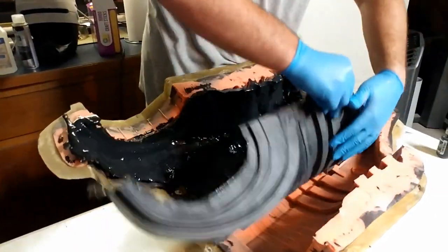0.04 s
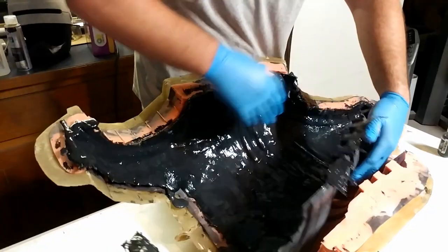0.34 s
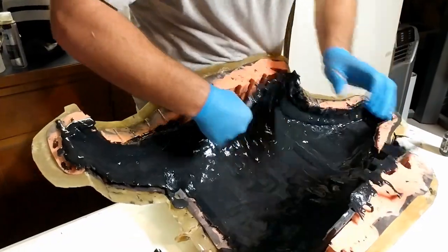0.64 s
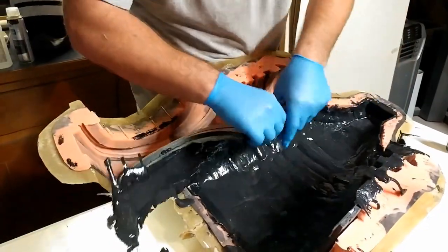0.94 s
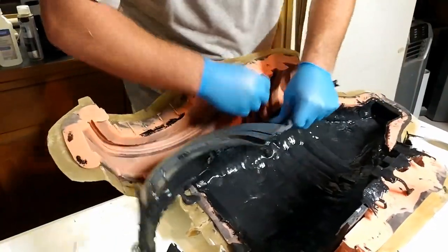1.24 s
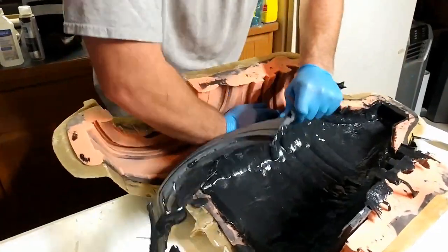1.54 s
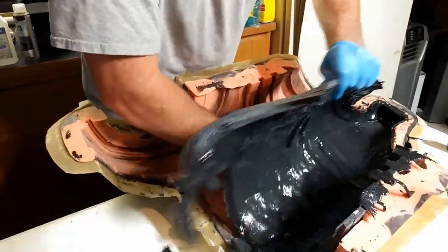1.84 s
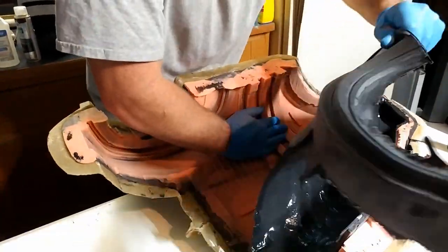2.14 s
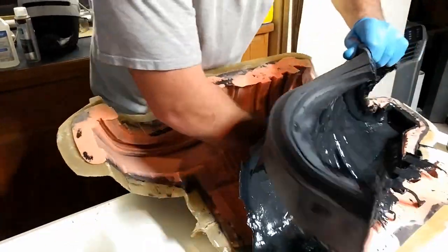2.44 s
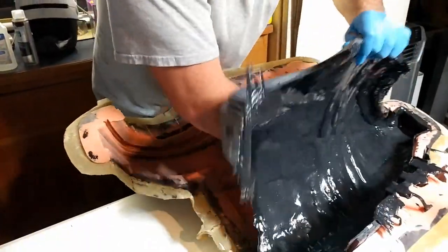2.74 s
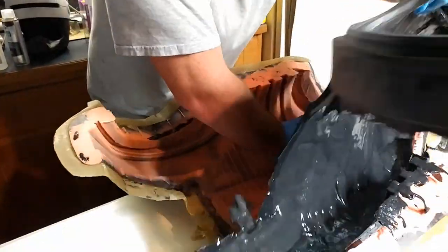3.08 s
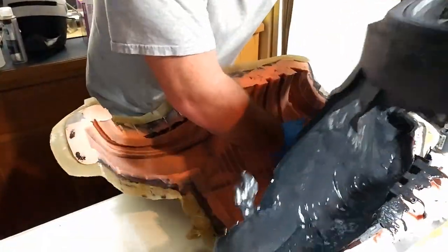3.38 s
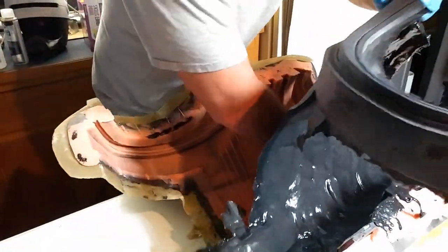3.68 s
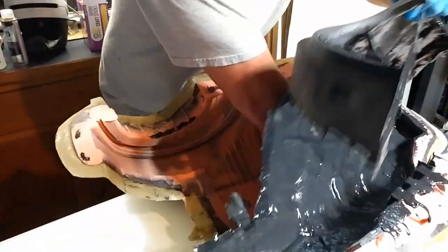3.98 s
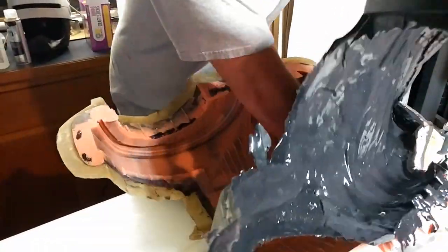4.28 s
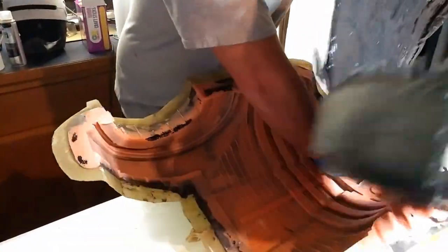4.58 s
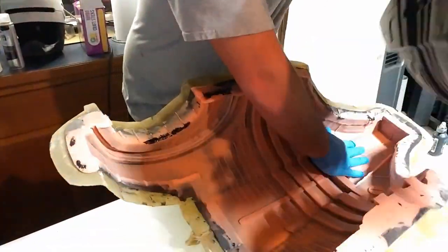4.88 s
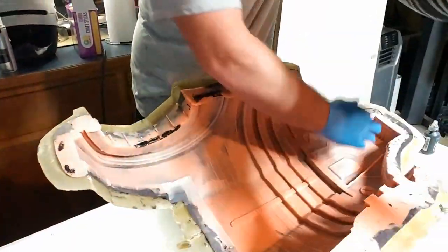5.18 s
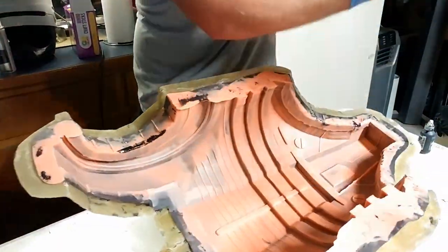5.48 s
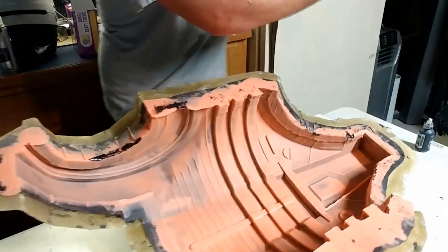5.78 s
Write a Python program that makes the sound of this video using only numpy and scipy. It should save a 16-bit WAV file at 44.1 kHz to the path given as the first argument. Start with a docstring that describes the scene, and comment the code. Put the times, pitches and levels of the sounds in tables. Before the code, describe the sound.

Gloved hands peel a soft foam casting from a silicone mold, close to a stereo microphone in a small workshop with a faint low rumble. Tacky crackling and rustling rise and fall throughout, dotted with tiny snaps of sticky threads. A flap slaps the hollow mold with a pop at 0.3 seconds, and rubber squeaks briefly around 1 second. Dull dragging and light slaps follow. From 2 to 2.6 seconds, air pockets open in a cluster of louder hollow pops, with a squeak and a tearing rasp. Two more pops come near 3.8 seconds and a soft slap at 4. After a few sharp snaps, the mold's hard shell clacks slightly to the right at about 4.9 seconds, followed by a sticky rip, a firm slap and a squeak at 5. From 5.6 seconds the freed casting slides away with a hiss that gradually dulls.

```python
"""Tacky skin rustles and crackles as gloved hands peel a soft foam casting out of a silicone mold,
close to a stereo microphone at a table in a small workshop. Countless tiny bonds break under the pull,
sticky threads snap, rubber squeaks, loose flaps slap the hollow mold and air pockets pop open.
Near the end the mold's hard shell clacks, and the freed casting slides away with a hiss."""
import sys
import numpy as np
from scipy import signal
from scipy.fft import rfft, irfft, next_fast_len
from scipy.io import wavfile

SR = 44100
rng = np.random.default_rng(int(sys.argv[2]) if len(sys.argv) > 2 else 0)


def inscribe(sig):
    """Save sig as 16-bit PCM at rate SR to the path in sys.argv[1].

    A 1-D sig is mono; a 2-D sig holds one channel per row.
    Samples are clipped to [-1, 1] before scaling.
    """
    pcm = np.round(np.clip(np.atleast_2d(sig).T, -1, 1) * 32767)
    wavfile.write(sys.argv[1], SR, pcm.astype(np.int16))


N = 265482
TIME = np.arange(N) / SR
BLOW_TIME = np.arange(SR // 3) / SR
RUB_EDGES_HZ = [120, 700, 2000, 6000, 17000]   # bands: body, scrape, rasp, hiss
BLOW_EDGES_HZ = [125, 260, 700, 1450, 3300, 10000]   # bands: thump, body, smack, crack, tick


def from_db(db):
    """Decibels to gain."""
    return 10 ** (np.asarray(db) / 20)


def unit_power(pair, size):
    """Scale a pair so that its centre has unit power over `size` samples."""
    return pair / np.sqrt(np.sum(pair.mean(axis=0) ** 2) / size + 1e-20)


def at_hz(points, hz):
    """Read a table on a log-frequency axis."""
    freq_hz, value = np.transpose(points)
    return np.interp(np.log(np.maximum(hz, 1)), np.log(freq_hz), value)


def centres(edges_hz):
    """The geometric centre of each band."""
    return np.sqrt(np.multiply(edges_hz[1:], edges_hz[:-1]))


def band(x, low_hz, high_hz, order=2):
    """Causal band-pass."""
    return signal.sosfilt(signal.butter(order, [low_hz, high_hz], "band", fs=SR, output="sos"), x)


def resonate(x, hz, width_hz):
    """A resonance with gain 1 at its peak."""
    radius = np.exp(-np.pi * width_hz / SR)
    poles = [1, -2 * radius * np.cos(2 * np.pi * hz / SR), radius ** 2]
    return signal.lfilter(np.array([1, 0, -1]) * (1 - radius ** 2) / 2, poles, x + 1e-18)


def pan(lean_db):
    """Left and right gains; positive leans left."""
    return from_db(np.array([[.5], [-.5]]) * lean_db)


def fade(t, t60_s):
    """Exponential decay, 60 dB down at t60_s."""
    return from_db(-60 * t / t60_s)


def ramp(t, half_time_s):
    """A smooth step from 0 to 1 around t = 0."""
    return (1 + np.sin(np.pi / 2 * np.clip(t / half_time_s, -1, 1))) / 2


def drift(rate_hz):
    """A random wander around zero."""
    knots = rng.standard_normal(N // 20)
    return np.interp(TIME * rate_hz, np.arange(len(knots)), knots)


def add(out, start_s, sound):
    """Mix a sound in at a time."""
    at = round(start_s * SR)
    out[:, at:at + sound.shape[-1]] += sound[..., :out.shape[-1] - at]


# How alike the microphone's two sides are: freq_hz, correlation
STEREO_LIKENESS = [(60, 0.94), (250, 0.95), (450, 0.83), (800, 0.47), (1400, 0.42), (2800, 0), (9000, 0)]
# How the sound leans across the microphone: freq_hz, left_minus_right_db
STEREO_LEAN = [(100, -0.6), (400, -0.5), (800, -0.5), (1400, -4.5), (2800, -6), (6000, -2), (9500, -1.5),
               (13000, 1.5)]
def spread(pair, colour=((10, 0), (20000, 0))):
    """Two unrelated signals become a coloured stereo pair, alike in the bass and apart in the treble."""
    size = pair.shape[-1]
    padded = next_fast_len(size, True)
    hz = np.fft.rfftfreq(padded, 1 / SR)
    mid, side = rfft(pair, padded)
    alike = at_hz(STEREO_LIKENESS, hz)
    both = np.sqrt(1 + alike) * mid + np.sqrt(1 - alike) * side * [[1], [-1]]
    return irfft(both * pan(at_hz(STEREO_LEAN, hz)) * from_db(at_hz(colour, hz)), padded)[:, :size]


def stereo_noise(t):
    """White noise spread across the microphone, as long as t."""
    return spread(rng.standard_normal((2, len(t))))


# The quiet workshop all around the microphone: freq_hz, density_db
ROOM_COLOUR = [(22, -24), (33, 2), (50, 9), (90, 5.5), (166, -2.5), (344, -10.5), (545, -12.5),
               (1330, -19.5), (3000, -22), (7000, -29.5), (16000, -30.5)]
def room_tone(level_db):
    """The room's steady low rumble."""
    return from_db(level_db) * unit_power(spread(rng.standard_normal((2, N)), ROOM_COLOUR), N)


def crackle(colour, grains_per_s, grain_spread_db, smooth_db):
    """Countless tiny bonds break over a smooth hiss; each break reaches both channels."""
    sizes = from_db(grain_spread_db * np.minimum(rng.exponential(1, N), 4))
    breaks = rng.random(N) < grains_per_s / SR
    grains = sizes * breaks * rng.standard_normal((2, N))
    grains /= np.sqrt(np.mean(grains ** 2))
    return spread(grains + from_db(smooth_db) * rng.standard_normal((2, N)), colour)


# Peeling skin heard close up: freq_hz, density_db
PEEL_COLOUR = [(100, 3), (150, -6.5), (200, -7), (350, -3), (600, -6.5), (1100, -14.5), (1500, -16.5),
               (3600, -15), (4600, -19), (5800, -21), (7000, -28), (9000, -18.5), (16000, -29.5)]
# The crackle rising and falling with the pull: time_s, relative_db
PULL_LEVELS = [(0, -43.5), (.17, -60.5), (.45, -52.5), (.6, -60), (1, -53.5), (1.4, -56), (1.75, -52.5),
               (2.2, -51), (2.38, -52), (2.55, -50), (2.9, -55.5), (3.15, -51.5), (3.5, -67.5),
               (3.9, -55.5), (4.1, -51.5), (4.37, -62), (5.5, -57.5)]
def tacky_skin(gain_db):
    """The skin crackles as it parts under the steady pull."""
    bonds = crackle(PEEL_COLOUR, grains_per_s=250, grain_spread_db=1, smooth_db=4.5)
    pull_db = np.interp(TIME, *np.transpose(PULL_LEVELS))
    return from_db(gain_db + pull_db) * unit_power(band(bonds, 92, 14400), N)


def friction(gains, texture, stutter_db, stutter_hz):
    """Each band of a rub stutters as the surface sticks and slips."""
    shared_slip, out = drift(stutter_hz), 0
    for gain, low, high in zip(gains, RUB_EDGES_HZ, RUB_EDGES_HZ[1:]):
        stutter = from_db(stutter_db * (shared_slip + .5 * drift(stutter_hz)))
        out += gain * stutter * unit_power(band(texture, low, high, order=3), N)
    return out


# Strokes of the hands at the table, levels relative: start_s, end_s, drag_db, tear_db
HAND_STROKES = [(.01, .058, -53, -39.5), (0.267, .282, -59, -49), (0.406, .44, -53.5, -50.5),
                (0.728, 0.858, -62, -53.5), (1.038, 1.089, -45, -52.5), (1.375, 1.391, -54, -57.5),
                (1.521, 1.613, -42, -52.5), (1.62, 1.767, -53.5, -71), (1.825, 1.908, -42, -59),
                (1.959, 2.094, -40, -42.5), (1.988, 2.03, -32, -35.5), (2.278, 2.303, -40, -47),
                (2.578, 2.84, -43.5, -65.5), (2.975, 3.084, -48, -60), (4.019, 4.048, -39, -71),
                (4.15, 4.277, -47, -74), (4.452, 4.545, -64.5, -61.5), (4.628, 4.791, -58, -56.5),
                (4.873, 4.956, -43.5, -34.5), (4.939, 5.055, -36, -54), (5.183, 5.205, -62, -61),
                (5.479, 5.578, -54, -78)]
def hand_strokes(gain_db):
    """With each stroke the foam drags dully on the mold while its tacky skin tears away."""
    drag_bands_db, tear_bands_db = np.array([.5, -.5, -8, -43.5]), np.array([-16, -12.5, -1.5, -1.5])
    sticky = crackle(PEEL_COLOUR, grains_per_s=1500, grain_spread_db=3.5, smooth_db=4.5)
    power, t = 0, TIME[::20]
    for start_s, end_s, drag_db, tear_db in HAND_STROKES:
        ease_s = .17 * (end_s - start_s)   # long strokes swell and let go more gently
        shape = ramp(t - start_s, .02 + ease_s) * ramp(end_s - t, .025 + ease_s)
        band_powers = from_db(drag_bands_db + drag_db) ** 2 + from_db(tear_bands_db + tear_db) ** 2
        power += np.outer(band_powers, shape)
    gains = [np.interp(TIME, t, gain) for gain in np.sqrt(power)]
    return from_db(gain_db) * friction(gains, sticky, stutter_db=2.5, stutter_hz=70)


# Small sticky snaps at the fingers: start_s, relative_db, pitch_hz, t60_s
THREAD_SNAPS = [(.139, -47, 3660, 0.049), (.2089, -48.5, 9500, .051), (.4296, -44, 3040, 0.074),
                (0.496, -41.5, 3100, 0.33), (0.728, -38, 6000, 0.045), (2.279, -33, 2590, 0.046),
                (3.7183, -52.5, 8600, 0.059), (4.412, -42, 3350, 0.15), (4.664, -32, 2620, .1),
                (4.74, -45, 1300, .06), (4.7846, -31, 8260, 0.0092), (5.249, -50.5, 9800, .04)]
def snaps(gain_db, width_share):
    """Single sticky threads and glove creases snap, each a noise burst in a broad resonance."""
    out = np.zeros((2, N))
    for start_s, level_db, hz, t60_s in THREAD_SNAPS:
        burst = stereo_noise(BLOW_TIME) * fade(BLOW_TIME, t60_s)
        snap = unit_power(resonate(burst, hz, hz * width_share), size=200)
        add(out, start_s, from_db(level_db + gain_db) * snap)
    return out


# Rubber slipping close by: centre_s, half_length_s, pitch_hz, width_share, relative_db
RUBBER_SLIPS = [(0.267, 0.015, 1080, 0.11, -50.5), (.268, 0.012, 2530, 0.14, -42),
                (.271, .012, 3860, 0.089, -48.5), (0.404, 0.0031, 2900, 0.057, -41.5),
                (1.042, 0.017, 1112, 0.08, -36.5), (1.064, 0.022, 3430, 0.19, -41),
                (1.274, 0.021, 9800, 0.23, -49.5), (1.6, 0.045, 11400, 0.53, -47),
                (1.996, 0.013, 920, .08, -31), (2.018, 0.014, 4270, 0.072, -37),
                (2.286, 0.0024, 2100, 0.27, -23), (3.073, .035, 3200, .17, -53.5),
                (4.225, .035, 4600, 0.3, -51.5), (5.011, 0.0091, 1145, 0.12, -22.5)]
def squeaks(gain_db):
    """Quick slips of rubber on rubber feed one resonance, narrow for a squeak and wide for a rasp."""
    out, t = np.zeros((2, N)), BLOW_TIME
    middle_s = t.mean()
    for centre_s, half_length_s, hz, width_share, level_db in RUBBER_SLIPS:
        slips = resonate(stereo_noise(t), hz, hz * width_share)
        swell = np.exp(-((t - middle_s) / half_length_s) ** 2 / 2)
        squeak = unit_power(slips * swell, np.sum(swell ** 2))
        add(out, centre_s - middle_s, from_db(level_db + gain_db) * squeak)
    return out


def smack(levels_db, t60_s, rise_s, treble_shortening):
    """A soft contact spreads over an area: a burst of noise whose treble dies first."""
    t, out = BLOW_TIME, 0
    noise = stereo_noise(t)
    for level_db, low, high in zip(levels_db, BLOW_EDGES_HZ, BLOW_EDGES_HZ[1:]):
        shape = (1 - np.exp(-t / rise_s)) * fade(t, t60_s * (400 / low) ** treble_shortening)
        burst = band(noise * shape, low, high, order=3 if high < 2000 else 2)
        out += from_db(level_db) * unit_power(burst, size=1300)
    return out


# Resonances of the hollow mold on its table: pitch_hz, width_hz, gain_db
MOLD_MODES = [(149.8, 14.6, -0.5), (352, 38, 1), (474, 14, -41), (816, 104, -3.5), (925, 48, -3.5),
              (1089, 53, -2.5), (1930, 27, -22), (3050, 160, -21)]
def mold(x):
    """The hollow mold adds its resonances to whatever touches it."""
    return x + sum(from_db(db) * resonate(x, hz, width_hz) for hz, width_hz, db in MOLD_MODES)


def mold_boom(levels_db, damping):
    """A blow sets the mold's modes ringing, each as hard as the blow is strong at that pitch."""
    force = np.transpose([centres(BLOW_EDGES_HZ), levels_db])
    out, t = 0, BLOW_TIME
    for hz, width_hz, db in MOLD_MODES:
        decay = np.exp(-np.pi * width_hz * damping * t)
        out += from_db(at_hz(force, hz) + db) * np.sin(2 * np.pi * hz * t) * decay
    return out


# Foam flaps landing on the mold: start_s, relative_db, tilt_db_per_octave, thump_db, base_t60_s, rise_s
FLAP_SLAPS = [(.323, -29, 1.1, -5, .12, 0.00068), (.727, -50.5, -1.5, 3.5, 0.07, 0.0005),
              (0.9128, -47.5, -1.1, -8, 0.079, .0004), (1.552, -41.5, 4.5, -7, 0.083, 0.0011),
              (1.654, -53, 0.5, 11.5, 0.14, 0.0014), (1.84, -35, 1.8, -1, 0.047, .0006),
              (2.686, -43, -6, -7, 0.2, 0.001), (3.988, -33.5, -5, -7.5, .077, 0.0017),
              (4.506, -54.5, 4, 12, 0.053, 0.00059), (4.622, -47, 2, 7.5, .065, 0.00091),
              (4.858, -32, 3.5, 3.5, 0.04, .0012), (4.928, -39, 6.5, 14.5, 0.083, .0006),
              (4.998, -23, -0.5, -1, 0.043, 0.0039), (5.165, -49, -6, -4, .1, .003)]
def slaps():
    """A flap's edge touches with a short crack as its face lands and the mold booms."""
    slap_bands_db, face_bands_db = np.array([-3.5, 0, -3.5, -5, -29]), [-3, -8.5, -1, -3, -1]
    octaves = np.log2(centres(BLOW_EDGES_HZ) / 686)
    out = np.zeros((2, N))
    for start_s, level_db, tilt_db, thump_db, t60_s, rise_s in FLAP_SLAPS:
        levels_db = slap_bands_db + level_db + tilt_db * octaves
        levels_db[0] += thump_db
        edge_db = -16 - 2500 * rise_s   # the longer a flap takes to land, the weaker its edge
        edge = smack(levels_db + edge_db, t60_s=.012, rise_s=.000086, treble_shortening=.48)
        face = smack(levels_db + face_bands_db, t60_s, rise_s, treble_shortening=.035)
        add(out, start_s, edge + face + from_db(3) * mold_boom(levels_db, damping=1.48))
    return out


# Air pockets between foam and mold, levels relative:
# start_s, cavity_db, pitch_hz, cavity_t60_s, skin_db, skin_base_t60_s
AIR_POCKETS = [(.332, -29, 350, .09, -50, .05), (1.986, -24, 547, 0.12, -38, 0.055),
               (2.0131, -17.5, 334, 0.15, -31, 0.062), (2.0969, -22.5, 387, 0.063, -30.5, 0.026),
               (2.1514, -26.5, 360.5, 0.12, -33.5, 0.089), (2.2838, -24.5, 361, 0.047, -36.5, 0.013),
               (2.4261, -23.5, 357.3, 0.15, -29, 0.12), (2.554, -23, 326, 0.073, -56, 0.022),
               (2.5639, -26, 368, 0.15, -57, .03), (3.759, -27, 382, 0.18, -66, 0.039),
               (3.805, -25, 379, 0.048, -49, 0.045)]
def pops(gain_db, sag_share, sag_s):
    """A pocket gulps open and the skin smacks free; the cavity rings, sinking in pitch as it widens."""
    skin_bands_db = np.array([-4.5, -4.5, -5.5, -12.5, -29])
    out, t = np.zeros((2, N)), BLOW_TIME
    for start_s, cavity_db, hz, t60_s, skin_db, skin_t60_s in AIR_POCKETS:
        gulp = from_db(4) * np.sin(2 * np.pi * hz * 1.4 * t) * fade(t, .0083)
        sinking_hz = hz * (1 + sag_share * (np.exp(-t / sag_s) - .5))
        cavity = np.sin(2 * np.pi * np.cumsum(sinking_hz) / SR) * fade(t, t60_s)
        skin = smack(skin_bands_db + skin_db, skin_t60_s, rise_s=.0003, treble_shortening=.081)
        # a quieter, lower tone rings on after the cavity fades
        low_ring = from_db(-13.5) * np.sin(2 * np.pi * hz * .87 * t) * fade(t, .24)
        pop = skin - from_db(cavity_db) * band(gulp + cavity + low_ring, 147, 1080) * pan(-1.3)
        # each pocket lies somewhere else, so the room answers each differently
        add(out, start_s, workshop(pop, wet_db=-8.5, build_s=.0029))
    return from_db(gain_db) * out


# The mold's hard outer shell, to the microphone's right: pitch_hz, relative_db, t60_s
SHELL_MODES = [(1797, -14.5, 0.017), (1924, -19, 0.031), (2400, -32, 0.041), (3230, -17.5, 0.022),
               (3530, -27.5, 0.074), (4700, -33, 0.056)]
def shell_clack(start_s, rise_s, lean_db):
    """As the casting comes free the stiff shell rings briefly, damped by its rubber lining."""
    out, t = np.zeros((2, N)), BLOW_TIME
    attack = 1 - np.exp(-t / rise_s)
    for hz, db, t60_s in SHELL_MODES:
        phase = rng.uniform(0, np.pi, (2, 1))
        add(out, start_s, from_db(db) * np.sin(2 * np.pi * hz * t + phase) * attack * fade(t, t60_s))
    return band(out, 800, 5900) * pan(lean_db)


# The sliding casting heard close up: freq_hz, density_db
CASTING_COLOUR = [(100, -3), (160, -11), (450, -7), (700, -12.5), (1000, 10.5), (2300, -2), (6000, -6),
                  (7500, -9), (9000, -4), (16000, -19)]
def casting_slide(start_s, swell_s, lag_s_per_octave, dulling_db_per_octave_s):
    """The slide swells from the lows upward as it gathers speed, then dulls as the casting settles."""
    bands_db = [-50.5, -43, -36, -36.5]
    smooth = crackle(CASTING_COLOUR, grains_per_s=8000, grain_spread_db=1.5, smooth_db=2.5)
    t, gains = TIME - start_s, []
    for db, octave in zip(bands_db, np.log2(centres(RUB_EDGES_HZ) / 1850)):
        swell = (1 + np.tanh((t - lag_s_per_octave * octave) / swell_s)) / 2
        dulling_db = dulling_db_per_octave_s * octave * np.maximum(t, 0)
        gains.append(swell * from_db(db - dulling_db))
    return friction(gains, smooth, stutter_db=1.02, stutter_hz=40)


# The workshop's reverberation around the table: freq_hz, t60_s
ROOM_DECAY = [(100, 0.36), (400, 0.31), (1500, 0.24), (5000, 0.19), (15000, 0.098)]
def workshop(x, wet_db, build_s):
    """Diffuse reflections of a small cluttered room, dying sooner in the treble."""
    t = np.arange(SR // 2) / SR
    noise, tail = stereo_noise(t), 0
    edges_hz = np.geomspace(60, 17000, 8)
    for low, high, t60_s in zip(edges_hz, edges_hz[1:], at_hz(ROOM_DECAY, centres(edges_hz))):
        tail += band(noise, low, high) * fade(t, t60_s)
    tail *= 1 - np.exp(-(t / build_s) ** 2)
    tail /= np.sqrt(np.sum(tail ** 2) / 2)
    return x + from_db(wet_db) * signal.fftconvolve(x, tail, axes=1)[:, :x.shape[-1]]


def scene():
    """Peeling, blows and the slide, close at the table, over the workshop's quiet rumble."""
    rumble = room_tone(level_db=-54.5)
    peeling = tacky_skin(gain_db=-5) + hand_strokes(gain_db=-3.5) + squeaks(gain_db=-3.5)
    blows = snaps(gain_db=-8, width_share=.35) + slaps()
    pockets = pops(gain_db=1, sag_share=.11, sag_s=.023)
    clack = shell_clack(start_s=4.858, rise_s=.00039, lean_db=-14.5)
    slide = casting_slide(start_s=5.594, swell_s=.035, lag_s_per_octave=.011, dulling_db_per_octave_s=13)
    rubbing = workshop(mold(peeling + slide), wet_db=-12.5, build_s=.0058)
    knocking = workshop(mold(blows + clack), wet_db=-9, build_s=.0038)
    return rumble + rubbing + knocking + pockets


def microphone(x, port_hz, q, share):
    """The ports resonate in the high treble, with a dip just above."""
    omega = 2 * SR * np.tan(np.pi * port_hz / SR)
    ports = signal.bilinear([omega ** 2], [1, omega / q, omega ** 2], SR)
    return (1 - share) * x + share * signal.lfilter(*ports, x)


def record(dry):
    """The close stereo microphone colours the treble; below 36 Hz and above 15.9 kHz is cut."""
    coloured = microphone(dry, port_hz=9650, q=6.2, share=.17)
    low_cut = signal.sosfilt(signal.butter(4, 36, "high", fs=SR, output="sos"), coloured)
    return signal.sosfilt(signal.ellip(10, .1, 90, 15900, fs=SR, output="sos"), low_cut)


dry = scene()
out = record(dry)
inscribe(out)
```